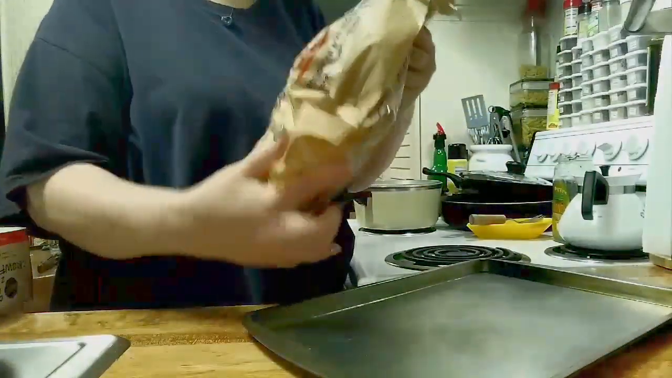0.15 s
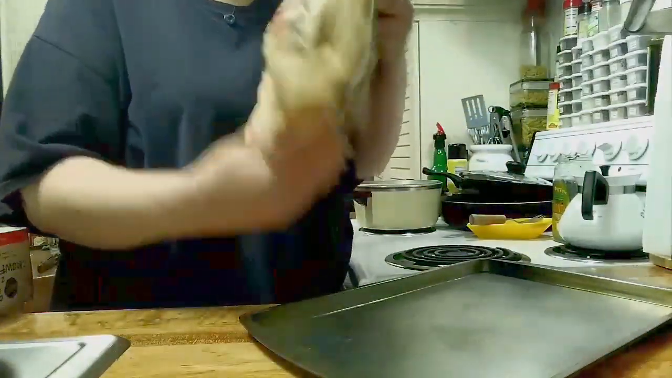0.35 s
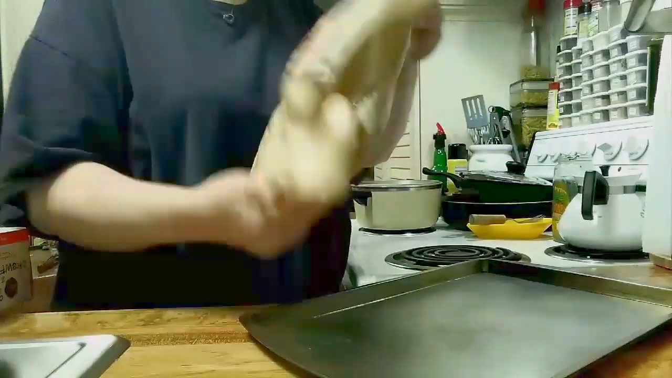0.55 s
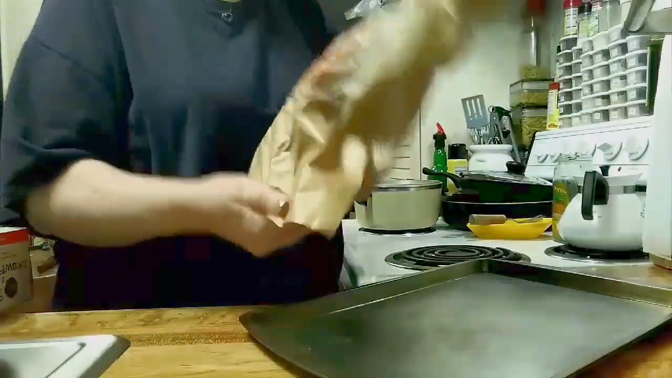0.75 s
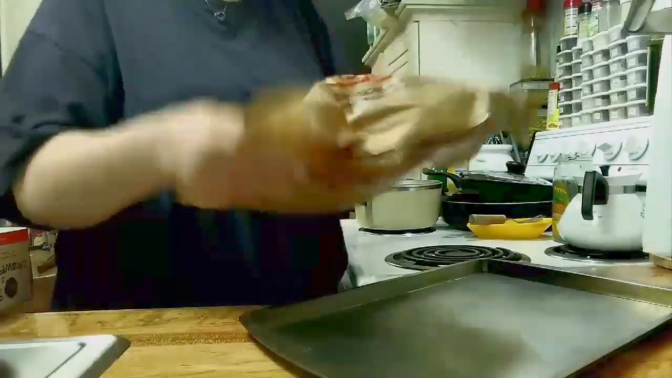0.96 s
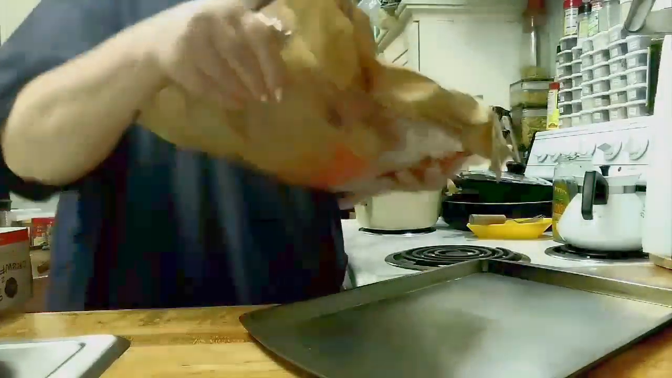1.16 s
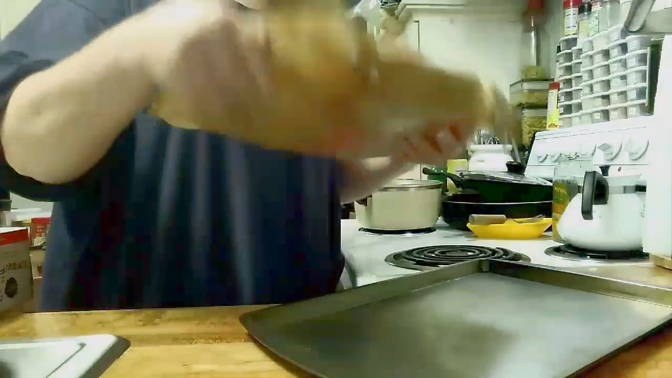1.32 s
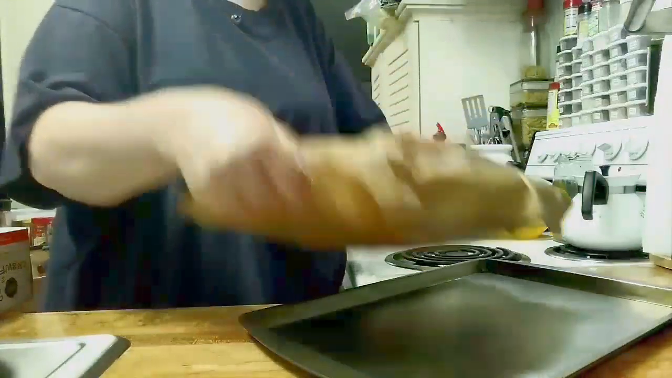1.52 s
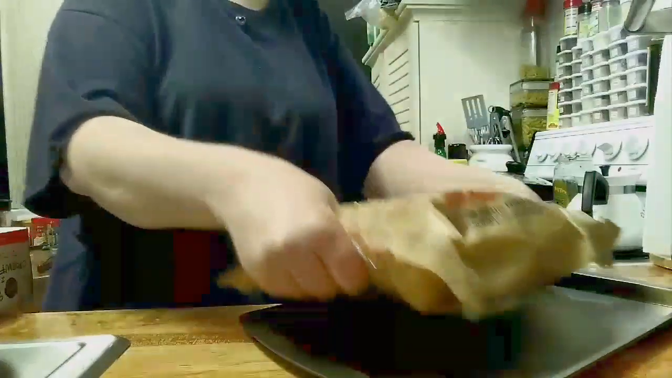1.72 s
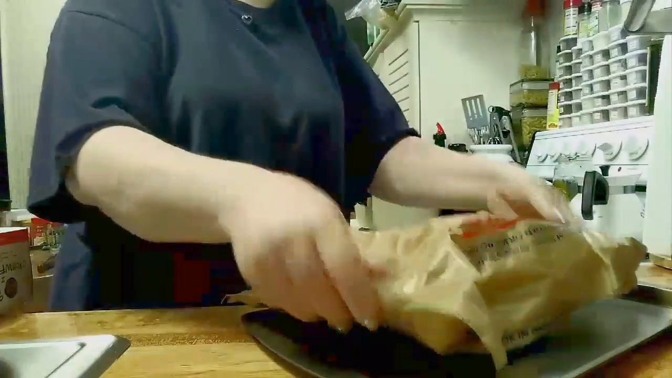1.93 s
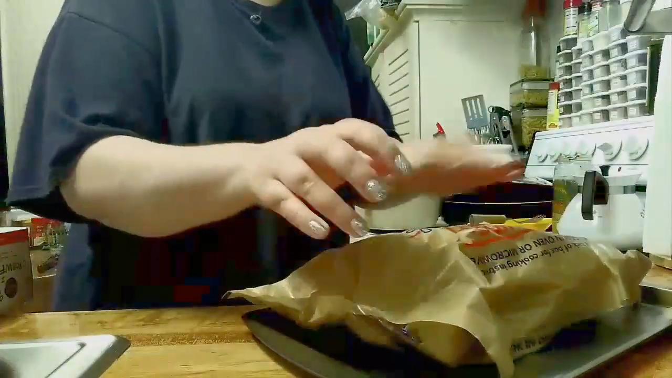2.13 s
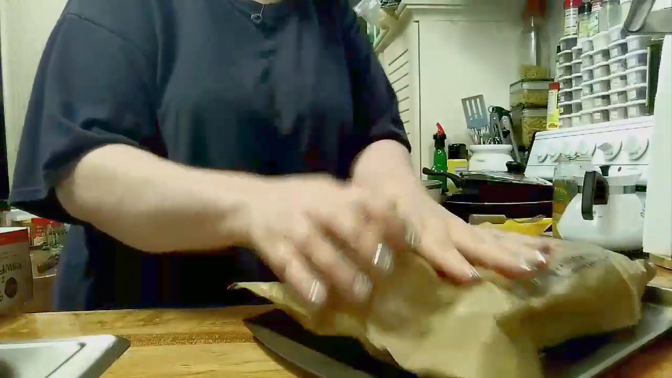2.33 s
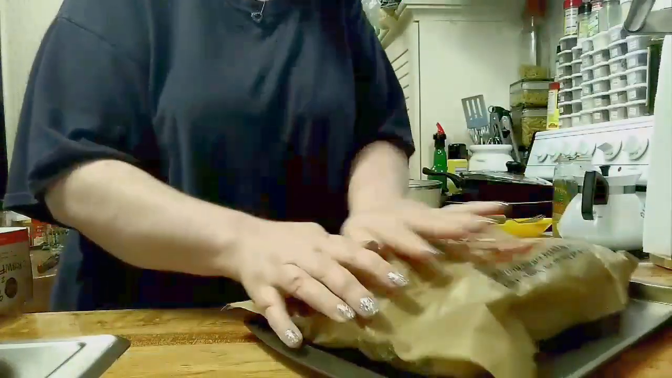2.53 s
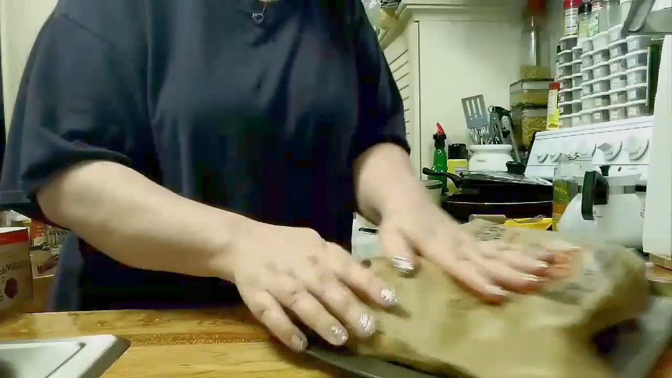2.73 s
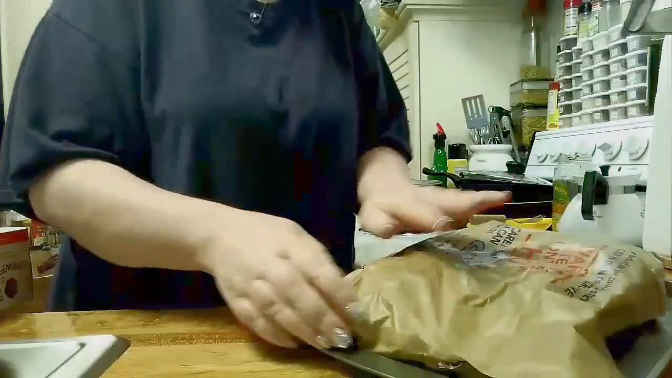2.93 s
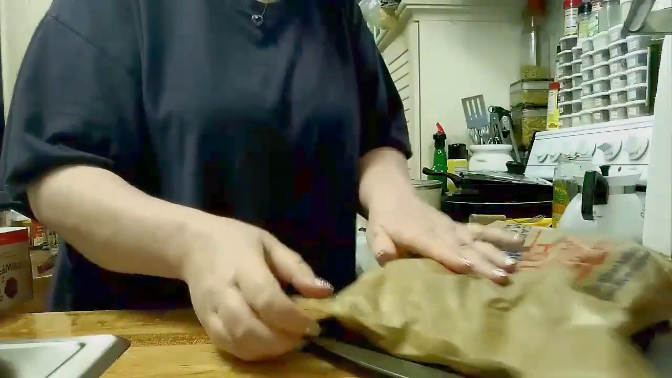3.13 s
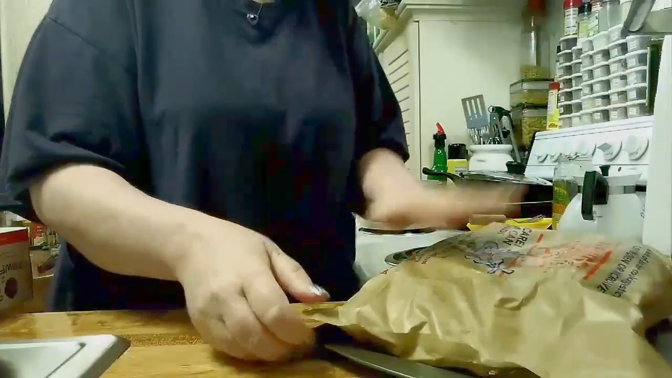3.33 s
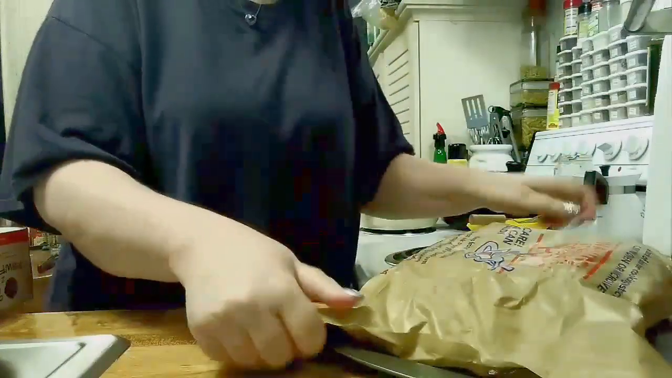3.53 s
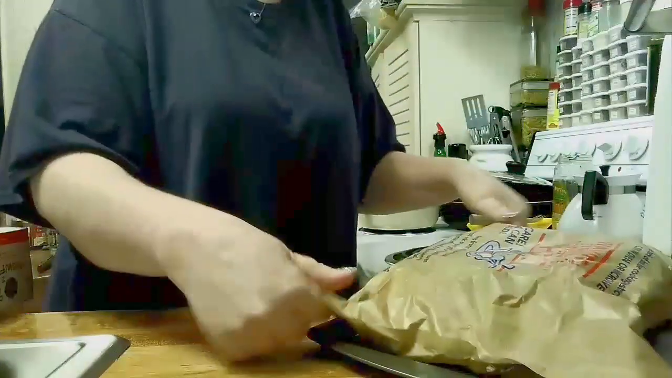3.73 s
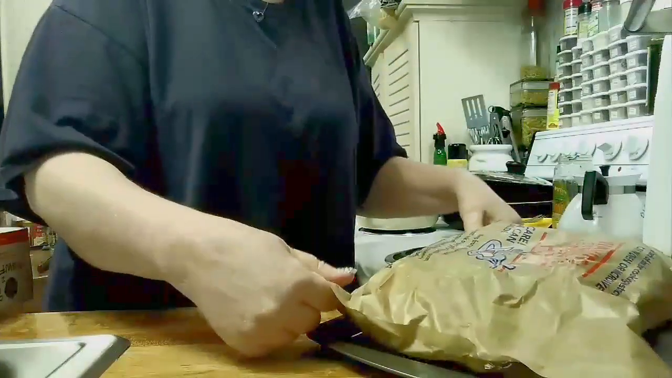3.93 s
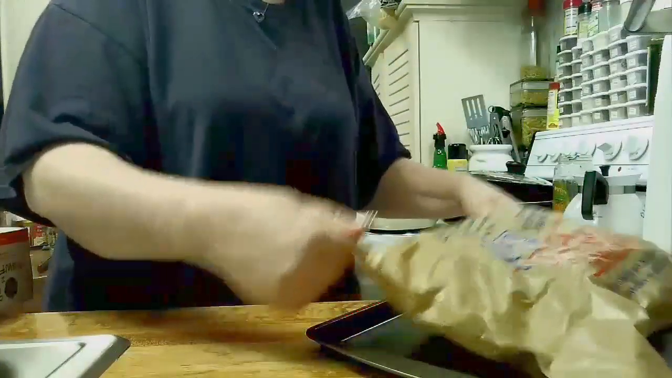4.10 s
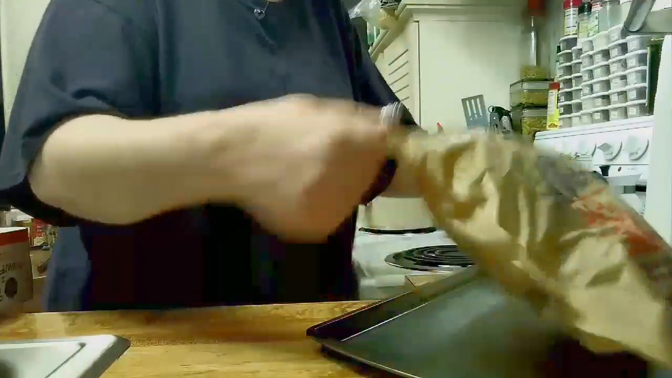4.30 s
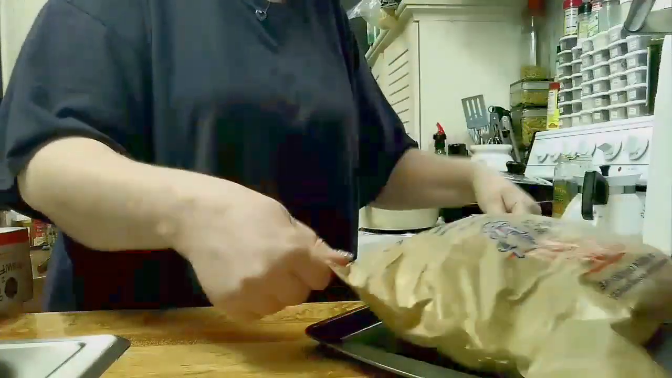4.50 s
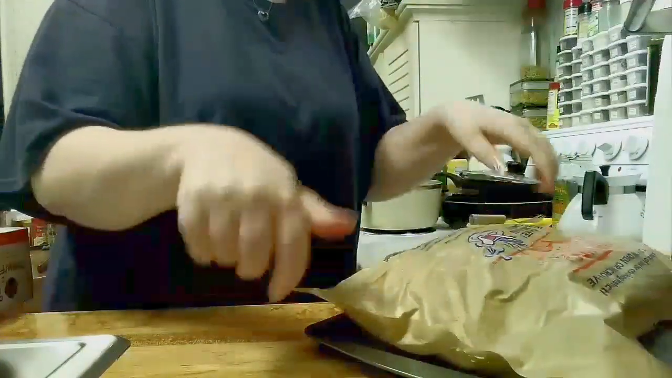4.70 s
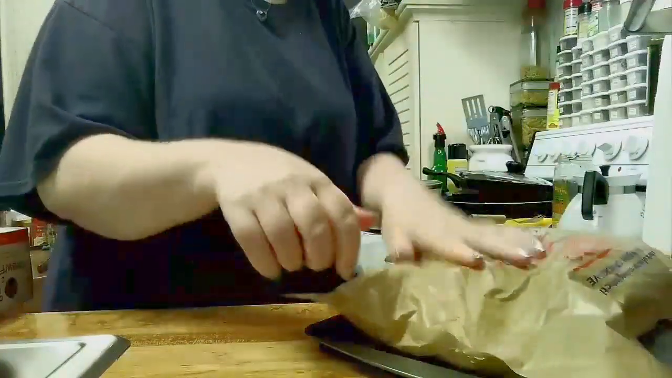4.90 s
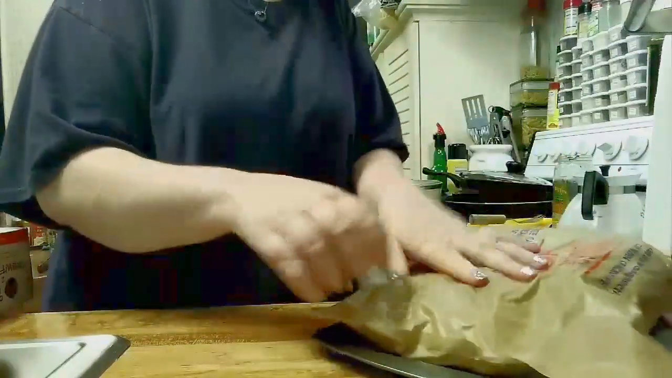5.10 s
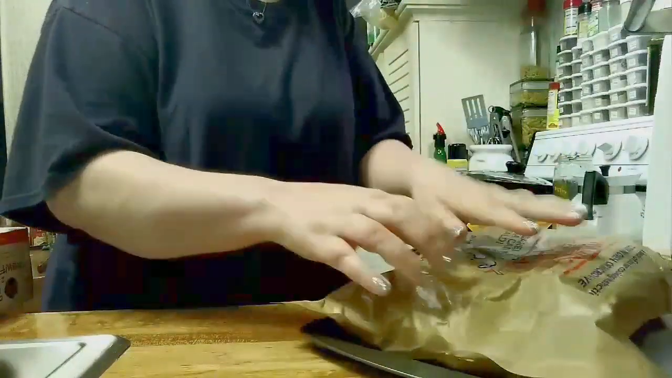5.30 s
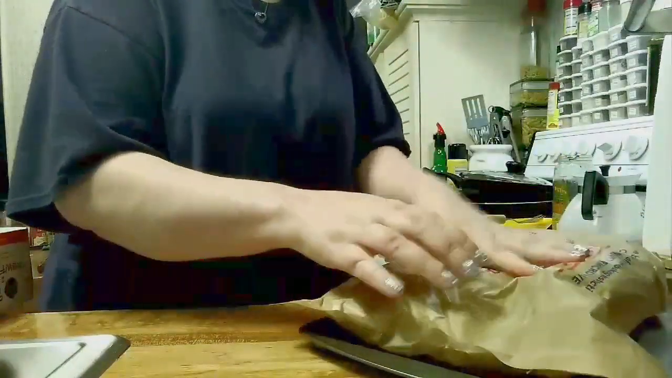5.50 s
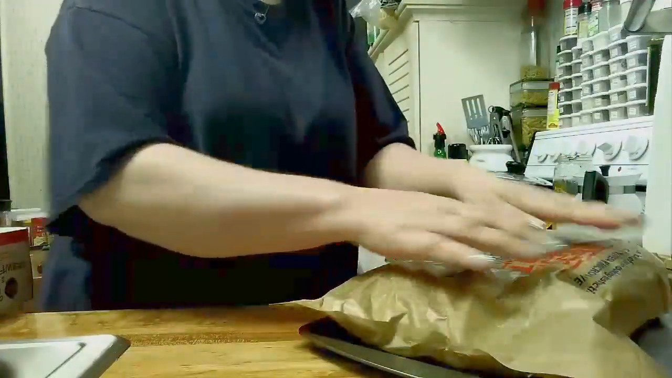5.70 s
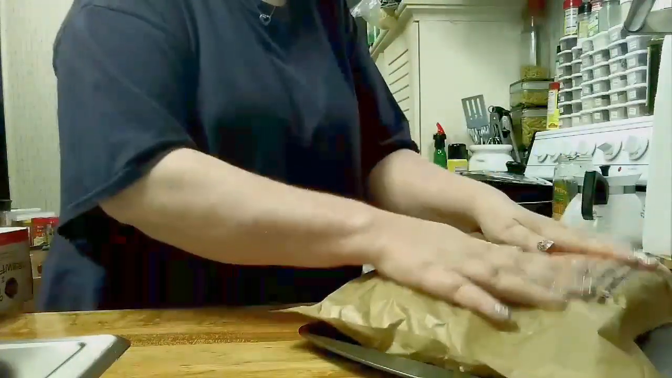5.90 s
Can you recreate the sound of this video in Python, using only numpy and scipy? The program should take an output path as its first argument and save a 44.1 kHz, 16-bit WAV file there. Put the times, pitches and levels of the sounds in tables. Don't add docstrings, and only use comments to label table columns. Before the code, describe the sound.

A stiff paper bag holding something heavy is handled close to a phone in a small kitchen with a faint steady hum. From 0 to 1.5 s it is turned and shaken: loud, dense, bright crinkling with sharp snapping folds and dull thumps from the contents. Around 1.5 to 2 s it is lowered onto a tray, the crackle breaking into bursts with hollow panel pops and a soft thud near 1.9 s. From 2.1 to 3.15 s hands press it in shorter, uneven crunches. Then it almost stills: a tiny finger squeak at about 3.3 to 3.45 s, isolated ticks, and a strong snap near 3.8 s. Crinkling swells from 3.9 s to a loud lift and drop around 4.3 s, then another crunch at 4.8 s. A sudden crackling pat with the heaviest thud comes at 5.3 s, followed by sparse ticks and a final soft rustle near 5.8 s. Room reflections are short.

```python
import sys
import numpy as np
from scipy import signal
from scipy.fft import rfft, irfft
from scipy.io import wavfile
from scipy.ndimage import uniform_filter1d, map_coordinates

SR = 44100
rng = np.random.default_rng(int(sys.argv[2]) if len(sys.argv) > 2 else 0)


def nominal_scale(level):
    x = np.asarray(level, float) / 20
    return 10 ** x


def pcm_store(signal):
    levels = np.round(np.clip(np.atleast_2d(signal), -1, 1) * 32767)
    wavfile.write(sys.argv[1], SR, levels.astype(np.int16).T)


N = 262394


def unit(x):
    return x / np.sqrt(np.mean(x ** 2) + 1e-20)


def curves(rows):
    s, *columns = np.transpose(rows)
    return [np.interp(np.arange(N) / SR, s, column) for column in columns]


def along(points, hz):
    f, v = np.transpose(points)
    return np.interp(np.log(hz + 1), np.log(f + 1), v)


def coloured(x, spectrum):
    m = 8192
    gain = nominal_scale(along(spectrum, np.fft.rfftfreq(m, 1 / SR)))
    cepstrum = irfft(np.log(gain + 1e-6), m)
    cepstrum[1:m // 2] *= 2
    cepstrum[m // 2 + 1:] = 0
    return signal.fftconvolve(x, irfft(np.exp(rfft(cepstrum)), m))[:N]


def noise():
    return rng.standard_normal(N)


def placed(starts_s, shapes):
    at = np.round(starts_s * SR).astype(int)[:, None] + np.arange(shapes.shape[1])
    return np.bincount(at.ravel(), shapes.ravel(), N + SR)[:N]


def wobble(rate_hz):
    knots = rng.standard_normal(int(N * rate_hz / SR) + 4)
    return map_coordinates(knots, [np.arange(N) * rate_hz / SR])


REST_DB = -79


def swells(rows):
    t = np.arange(0, N, 32) / SR
    power = nominal_scale(REST_DB) ** 2
    for s, db, rise_s, fall_s in rows:
        early = np.maximum(s - t, 0) / rise_s
        late = np.maximum(t - s, 0) / fall_s
        power = power + nominal_scale(db - 10 * (early + early ** 3) - 20 * late) ** 2
    return np.interp(np.arange(N) / SR, t, 10 * np.log10(power))


def ticks(count, t60, spread_db, low_hz, high_hz):
    t = np.arange(160) / SR
    s, size, life, pitch = rng.random((count, 4)).T[..., None]
    gain = nominal_scale(-spread_db * np.log(1 - .99 * size) - 60 * t / (t60 * (0.67 + life)))
    hz = low_hz * (high_hz / low_hz) ** pitch
    ring = 0.92 * np.sin(2 * np.pi * hz * t)
    return placed(s[:, 0] * N / SR, gain * (ring + 0.98 * rng.standard_normal(gain.shape)))


def damped_notes(hz, cycles):
    turns = hz[:, None] * np.arange(700) / SR
    return np.sin(2 * np.pi * turns) * nominal_scale(-60 * turns / cycles)


def flexes(count, centre_hz, octaves, cycles, spread_db):
    s, size = rng.random((count, 2)).T
    hz = np.clip(centre_hz * 2 ** (octaves * rng.standard_normal(count)), 150, 9000)
    gain = nominal_scale(-spread_db * np.log(1 - .99 * size)) * np.sqrt(hz / centre_hz)
    return placed(s * N / SR, gain[:, None] * damped_notes(hz, cycles))


# frequency_hz, level_db
AIR_COLOUR = [(15, -16), (25, 0), (206, -9), (301, 13.5), (1790, -34), (2350, -23), (6210, -45.5),
              (11600, -18), (16000, -28)]


def kitchen_air():
    return nominal_scale(-73) * unit(coloured(noise(), AIR_COLOUR))


# frequency_hz, t60_s
KITCHEN_DECAY = [(200, 0.2), (2000, 0.13), (8000, 0.14), (15000, 0.06)]


def kitchen(x):
    step = SR // 4
    delay = 130
    out = np.zeros(N + SR)
    for start in range(0, N, step):
        hz, t, z = signal.stft(rng.standard_normal(SR // 3), SR, nperseg=256)
        decay = nominal_scale(-60 * t / along(KITCHEN_DECAY, hz)[:, None])
        tail = signal.istft(z * decay, SR, nperseg=256)[1]
        wet = signal.fftconvolve(x[start:start + step], tail / np.linalg.norm(tail))
        out[start + delay:][:len(wet)] += wet
    return out[:N]


# time_s, pitch_hz, level_db
RUB = [
    (3.31, 1750, -75),
    (3.33, 1750, -63),
    (3.38, 1760, -63),
    (3.46, 1740, -72),
]


def squeak():
    hz, db = curves(RUB)
    phase = 2 * np.pi * np.cumsum(hz * (1 + .11 * wobble(300))) / SR
    t = np.arange(N) / SR
    sounding = (t > RUB[0][0]) & (t < RUB[-1][0])
    tone = np.sin(phase) + .3 * np.sin(2 * phase)
    return sounding * nominal_scale(db + 5 * wobble(160)) * tone


# frequency_hz, level_db
LOAD_COLOUR = [(20, -27), (35, -13), (60, 3), (160, 6.5), (260, -0.5), (500, -26.5)]
# peak_s, level_db
THUDS = [(0.14, -52), (0.35, -54), (0.45, -50), (0.55, -50), (0.7, -52), (0.87, -52), (1.07, -47),
         (1.15, -52), (1.6, -56), (1.7, -55), (1.88, -46), (2.05, -60), (2.15, -52), (2.24, -51),
         (2.48, -50), (2.93, -44), (3.15, -55), (4.29, -43), (4.81, -47), (4.47, -54), (4.53, -51),
         (4.1, -54), (4.2, -52), (5.285, -38), (5.42, -52), (5.68, -50), (5.8, -54)]


def contents(crease_db):
    rise_s, fall_s = .04, .07
    thud_db = swells([(s, db, rise_s, fall_s) for s, db in THUDS])
    effort_db = -61 + 1.1 * (crease_db + 20)
    shifting = nominal_scale(effort_db) + nominal_scale(thud_db) + nominal_scale(-79)
    load = nominal_scale(3.2 * wobble(12)) * coloured(noise(), LOAD_COLOUR)
    return shifting * unit(load)


# frequency_hz, level_db
CREASE_COLOUR = [(1470, -35), (2500, -18.5), (3120, -13), (4050, -8.5), (4590, -11.5), (5820, -9),
                 (6810, -10.5), (12000, -0.5), (15100, -8), (15900, -10.5), (16500, -62)]


def bursts(count, t, t60):
    hiss = coloured(noise(), CREASE_COLOUR)[:count * len(t)].reshape(count, -1)
    x = hiss * nominal_scale(-60 * t / t60) * (1 - np.exp(-t / .0003))
    return x / np.abs(x).max(axis=1, keepdims=True)


# frequency_hz, level_db
BODY_COLOUR = [(100, -24), (200, -11.5), (300, -10), (560, 0), (660, -3.5), (730, -5.5), (1300, -3),
               (2100, 2), (3500, -5.5), (7000, -25)]
# start_s, level_db
LONE_TICKS = [(0.016, -13), (0.0427, -15), (0.0529, -11), (0.0664, -15), (0.0942, -15), (0.1022, -16),
              (0.1158, -15), (0.1648, -20), (0.1841, -13), (0.5579, -13), (0.7122, -12), (0.9465, -15),
              (1.389, -21), (1.3955, -18), (1.4917, -25), (1.5875, -35), (1.6473, -31), (1.7032, -25),
              (1.7138, -26), (1.7285, -22), (1.742, -23), (1.8274, -15), (1.917, -17), (1.9941, -33),
              (2.0336, -38), (2.0426, -33), (2.2, -18), (2.2225, -12), (2.3235, -19), (2.4153, -18),
              (2.4584, -16), (2.5263, -14), (2.5528, -14), (2.6794, -23), (2.6871, -17), (2.7034, -20),
              (2.734, -26), (2.9201, -22), (3.1139, -24),
              (3.1407, -22), (3.6089, -45), (3.9185, -25), (3.9558, -22), (3.9906, -19), (4.0026, -16),
              (4.0183, -17), (4.041, -17), (4.1107, -14), (4.1251, -16), (4.1609, -15), (4.1881, -15),
              (4.2163, -14), (4.3824, -20), (4.4245, -33), (4.4423, -27), (4.4495, -22), (4.7714, -36),
              (4.8271, -17), (4.8651, -18), (4.9784, -23), (5.0307, -29), (5.1251, -33), (5.1654, -44),
              (5.1779, -35), (5.2231, -43), (5.3461, -23), (5.3871, -35), (5.4724, -30), (5.6661, -25),
              (5.6793, -23), (5.7654, -23), (5.7857, -20), (5.8067, -17), (5.8138, -19), (5.826, -22),
              (5.847, -22), (5.8698, -29), (5.9061, -31), (5.9447, -29)]


def lone_ticks():
    s, db = np.transpose(LONE_TICKS)
    t = np.arange(300) / SR
    t60 = .0045
    size = nominal_scale(db + 5)[:, None]
    tap = placed(s, size * rng.standard_normal((len(s), len(t))) * nominal_scale(-30 * t / t60))
    return placed(s, size * bursts(len(s), t, t60)) + nominal_scale(-12) * coloured(tap, BODY_COLOUR)


# start_s, level_db, panel_share_db, panel_pitch_hz
GRIPPED = [(0.001, -8, -30, 2700), (0.01, -3, -39, 2760), (0.0304, -7, -37, 3750), (0.041, -10, -45, 3180),
           (0.0523, -8, -42, 2920), (0.0932, -13, -13, 3060), (0.1294, -9, -25, 3910),
           (0.1404, -8, -13, 3430)]
# start_s, level_db, panel_share_db, panel_pitch_hz
SHAKEN = [(0.183, -6, -45, 3060), (0.2014, -9, -17, 3880), (0.214, -5, -35, 3940), (0.305, -8, -13, 2440),
          (0.3374, -6, -10, 3990), (0.375, -7, -18, 3920), (0.439, -9, -28, 2200), (0.5144, -9, -16, 2230),
          (0.5294, -8, -15, 504), (0.6544, -15, -10, 2940), (0.7113, -12, -20, 3770),
          (0.7598, -12, -23, 3950), (0.819, -9, -21, 2080), (0.8644, -8, -17, 3990),
          (0.9778, -5, -12, 3580), (1.0605, -10, -22, 3990), (1.1484, -13, -7, 3790),
          (1.214, -9, -25, 3680), (1.278, -10, -21, 3760), (1.3582, -10, -40, 3880),
          (1.4323, -11, -12, 2860), (1.4703, -7, -21, 3680)]
# start_s, level_db, panel_share_db, panel_pitch_hz
LAID = [(1.502, -16, -10, 605), (1.519, -6, -20, 1440), (1.5505, -13, -31, 2100), (1.5662, -16, -21, 1590),
        (1.6015, -12, -9, 2290), (1.6227, -11, -20, 2520), (1.6775, -6, -14, 2300), (1.727, -19, -33, 2190),
        (1.7549, -8, -23, 1750), (1.773, -10, -15, 2300), (1.8028, -7, -28, 470), (1.9174, -11, -15, 2200),
        (1.989, -15, -39, 2170), (2.0552, -11, -14, 1500), (2.1246, -6, -10, 3200), (2.215, -6, -22, 520),
        (2.2647, -11, -18, 2190), (2.3236, -8, -17, 3530), (2.34, -6, -3, 1580), (2.368, -8, -14, 3280),
        (2.419, -5, -13, 2320), (2.4443, -18, -2, 2300), (2.523, -18, -6, 2160), (2.5596, -8, -25, 3520),
        (2.6167, -13, -18, 2150)]
# start_s, level_db, panel_share_db, panel_pitch_hz
FINGERED = [(2.8374, -25, -15, 715), (2.8781, -14, -14, 587), (2.9023, -13, -12, 2040),
            (2.9144, -5, -17, 2400), (2.9552, -17, -10, 2080), (3.0005, -9, -17, 593),
            (3.0639, -17, -7, 2150), (3.081, -14, -5, 2180), (3.1138, -22, 1, 2260), (3.136, -20, -5, 2350),
            (3.3416, -48, 5, 1780), (3.3822, -30, 0, 1760), (3.3998, -26, -14, 1660),
            (3.4203, -17, -3, 1680), (3.5029, -35, -16, 2050), (3.5115, -34, -14, 1790),
            (3.5678, -35, -26, 589), (3.6085, -41, -6, 485), (3.6371, -27, -11, 2120),
            (3.6505, -14, -13, 2300), (3.69, -22, -5, 1510), (3.6993, -19, -1, 3360),
            (3.7114, -22, -17, 3530), (3.7558, -27, -13, 1280), (3.8018, -26, -8, 2200),
            (3.826, -5, -35, 1650), (3.8625, -30, 4, 2150), (3.894, -17, -4, 1850)]
# start_s, level_db, panel_share_db, panel_pitch_hz
PATTED = [(3.9539, -17, -4, 543), (4.002, -12, -13, 560), (4.0394, -12, -7, 590), (4.1116, -11, -6, 3140),
          (4.1585, -19, 3, 1840), (4.2574, -10, -17, 528), (4.294, -8, -12, 1850), (4.3514, -9, -13, 512),
          (4.4428, -17, -10, 608), (4.7354, -34, 1, 2150), (4.7498, -29, -16, 1730),
          (4.777, -12, -18, 1900), (4.8014, -6, -12, 647), (4.8278, -19, 2, 926), (4.8643, -14, -10, 2120),
          (4.9282, -9, -19, 2250), (5.1056, -27, -5, 2820), (5.1877, -18, -11, 1700),
          (5.2601, -5, -14, 2020), (5.2684, -9, -3, 2300), (5.3, -14, -13, 2170), (5.3958, -28, 5, 1570),
          (5.423, -24, -5, 2310), (5.474, -22, -13, 3720), (5.5094, -22, -7, 1150), (5.5698, -24, -4, 1820),
          (5.6625, -17, -7, 1570), (5.673, -16, 0, 2150), (5.7054, -20, -9, 567), (5.7775, -12, -13, 1740)]
FOLDS = [GRIPPED, SHAKEN, LAID, FINGERED, PATTED]


def snaps():
    s, db, share_db, hz = np.concatenate(FOLDS).T
    t = np.arange(900) / SR
    crack = placed(s, nominal_scale(db - 1.5)[:, None] * bursts(len(s), t, t60=.008))
    thump = rng.standard_normal((len(s), len(t))) * nominal_scale(-60 * t / .024) * (1 - np.exp(-t / .0006))
    knock = coloured(placed(s, nominal_scale(db + share_db + 4)[:, None] * thump), BODY_COLOUR)
    note = placed(s, nominal_scale(db + share_db - 8)[:, None] * damped_notes(hz, cycles=32))
    return crack + knock + note


SHOWER_DB = [-22, -15, -19, -17, -15]


def showers():
    s, db, share_db, _ = np.concatenate(FOLDS).T[..., None]
    under_db = np.repeat(SHOWER_DB, [len(rows) for rows in FOLDS])[:, None]
    t = np.arange(SR // 6) / SR
    shower = nominal_scale(db + under_db - 60 * t / 0.048) * (1 - np.exp(-t / 0.0034))
    return placed(s[:, 0], shower), placed(s[:, 0], nominal_scale(share_db + 1.0) * shower)


# time_s, level_db
HOLLOW = [(0.2, -15), (0.55, -10.5), (0.75, -14), (1.3, -15), (1.5, -9), (1.75, -10), (2.05, -9),
          (2.3, -10), (2.7, -8), (2.85, -2), (3.0, -9), (3.36, 0), (3.5, -4), (3.85, -4), (4.0, -9),
          (4.8, -6), (5.15, -1), (5.95, -6)]


def panels(crease_db, shower, clumps):
    panel_db = crease_db + curves(HOLLOW)[0]
    pops = unit(flexes(count=4000, centre_hz=1300, octaves=1.23, cycles=17, spread_db=1.5))
    rustle = unit(ticks(count=6000, t60=0.0042, spread_db=-0.5, low_hz=309, high_hz=5180))
    body = coloured(0.59 * pops + 0.97 * rustle, BODY_COLOUR)
    return (nominal_scale(panel_db - 2.4) + shower) * unit(nominal_scale(1.25 * clumps) * body)


def creases(crease_db, shower, clumps):
    stream = ticks(count=24000, t60=0.005, spread_db=1.2, low_hz=2547, high_hz=15800)
    bright = coloured(stream, CREASE_COLOUR)
    uneven = nominal_scale(.6 * clumps + 1.1 * wobble(400))
    return (nominal_scale(crease_db - 3) + shower) * unit(uneven * bright)


# peak_s, level_db,
# rise_s, fall_s (from and to 20 dB below)
GESTURES = [(0.0, -20, .1, .06), (0.045, -28, .06, .1), (0.115, -23, .07, .2), (0.225, -14.5, .06, .2),
            (0.32, -17, .08, .2), (0.385, -16, .08, .2), (0.445, -17, .04, .2), (0.53, -20, .1, .15),
            (0.61, -22, .06, .15), (0.67, -18, .12, .15), (0.73, -18, .08, .2), (0.795, -18, .06, .1),
            (0.875, -17, .15, .17), (0.95, -23, .02, .1), (1.0, -15, .05, .3), (1.05, -18, .08, .2),
            (1.08, -20, .06, .1), (1.115, -21, .04, .06), (1.15, -21, .02, .1), (1.185, -16, .04, .2),
            (1.22, -18, .06, .08), (1.29, -16, .09, .16), (1.42, -29, .1, .14), (1.62, -39, .02, .15),
            (1.68, -26, .014, .06), (1.72, -32, .06, .2), (1.825, -24, .04, .1), (1.855, -17.5, .04, .1),
            (1.915, -28, .05, .035), (2.043, -42, .01, .04),
            (2.14, -24, .028, .12), (2.225, -22, .05, .1), (2.27, -22, .08, .1), (2.36, -23, .04, .12),
           (2.46, -27, .08, .15), (2.52, -21, .06, .1), (2.56, -20, .06, .1), (2.63, -30, .06, .15),
           (2.69, -26, .04, .1), (2.735, -32, .08, .045), (2.905, -33, .02, .1), (2.965, -27, .03, .1),
           (2.995, -27, .05, .05), (3.15, -26.5, .12, .05), (3.37, -59, .04, .15), (3.46, -53, .06, .1),
           (3.51, -49, .03, .07), (3.6, -54, .04, .15), (3.66, -42, .05, .1), (3.71, -44, .03, .1),
           (3.77, -43, .05, .15), (3.86, -36, .025, .4), (3.97, -26, .04, .2), (4.03, -23, .1, .25),
           (4.11, -26, .1, .25), (4.2, -22, .2, .15), (4.265, -18, .05, .1), (4.31, -16, .06, .09),
           (4.38, -28, .04, .04), (4.46, -31, .06, .1), (4.545, -30, .07, .048), (4.772, -33, .008, .1),
           (4.815, -21, .03, .12), (4.872, -27, .04, .04), (4.94, -30, .03, .1), (4.99, -29, .07, .07),
           (5.07, -43, .05, .1), (5.12, -41, .06, .045), (5.178, -45, .005, .04), (5.22, -52, .04, .1),
           (5.275, -19, .02, .08), (5.305, -25, .03, .1), (5.42, -43, .1, .2), (5.66, -54, .015, .05),
           (5.68, -34, .02, .2), (5.82, -25, .12, .11), (5.95, -41, .03, .1)]


def crinkle():
    crease_db = swells(GESTURES)
    bright_shower, hollow_shower = showers()
    clumps = wobble(55)
    paper = creases(crease_db, bright_shower, clumps) + panels(crease_db, hollow_shower, clumps)
    return paper + contents(crease_db)


def scene():
    bag = crinkle() + snaps() + lone_ticks() + squeak()
    return (bag + nominal_scale(-9.5) * kitchen(bag) + kitchen_air())[None]


# frequency_hz, margin_db
DROPOUT = [(2000, -30), (3000, -6.5), (5000, -4), (9000, -4), (10500, -8), (13000, -8), (15000, -5)]


def starved(x, size, width, span, margin_db, luck_db):
    hz, _, z = signal.stft(x, SR, "cosine", nperseg=size)
    power = np.add.reduceat(np.abs(z) ** 2, np.arange(0, len(hz), width))
    around = uniform_filter1d(uniform_filter1d(power, size=5, axis=0), size=span, axis=1)
    luck = luck_db * unit(uniform_filter1d(rng.standard_normal(power.shape), size=2, axis=1))
    limit = nominal_scale(along(DROPOUT, hz[::width])[:, None] + margin_db + luck) ** 2
    keep = np.where(power < limit * around, nominal_scale(-24), 1)
    return signal.istft(z * keep[np.arange(len(hz)) // width], SR, "cosine", nperseg=size)[1][:N]


def roll_off(x):
    return signal.sosfilt(signal.butter(12, 17040, fs=SR, output="sos"), x)


# frequency_hz, level_db
BAND_EDGE = [(15600, 0.5), (15950, -8), (16100, -42), (17000, -55)]


def record(dry):
    rounded = dry[0] / (1 + np.abs(dry[0] / .45) ** 3) ** (1 / 3)
    limited = coloured(rounded, BAND_EDGE)
    short = starved(limited, size=256, width=6, span=14, margin_db=-6, luck_db=4.5)
    long = starved(short, size=1536, width=10, span=1, margin_db=.8, luck_db=3.5)
    return roll_off(long[None])


dry = scene()
out = record(dry)
pcm_store(out)
```